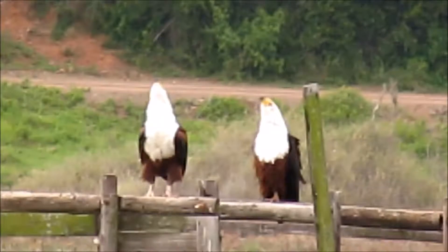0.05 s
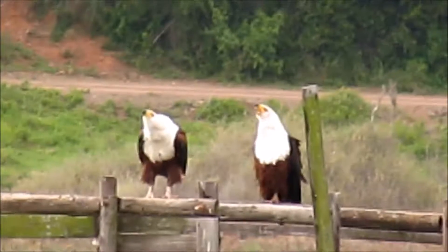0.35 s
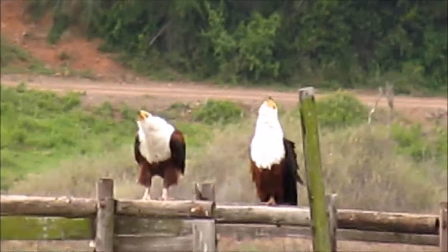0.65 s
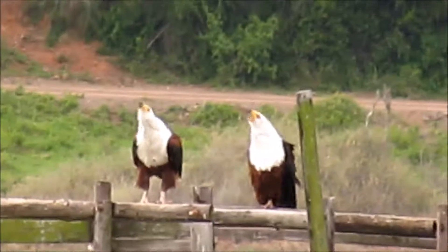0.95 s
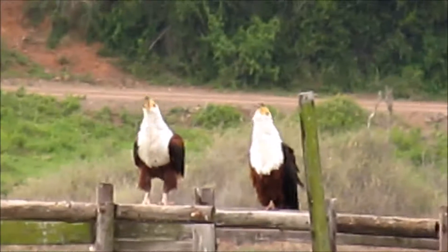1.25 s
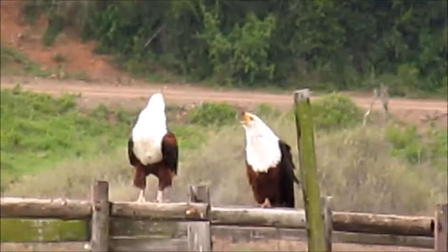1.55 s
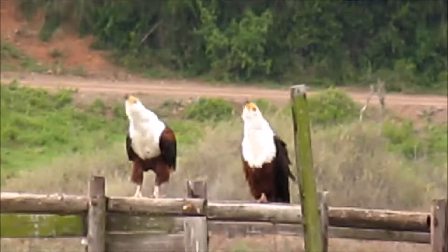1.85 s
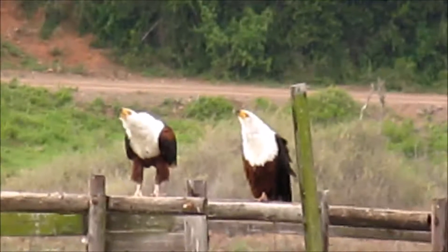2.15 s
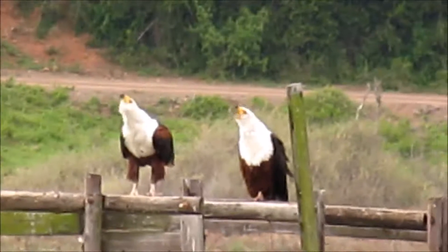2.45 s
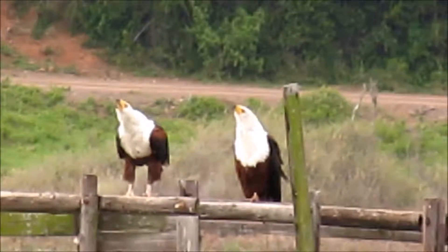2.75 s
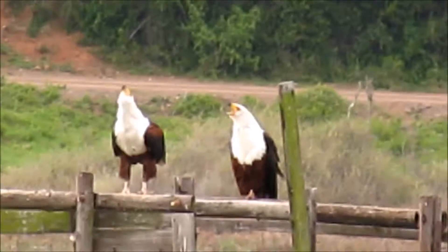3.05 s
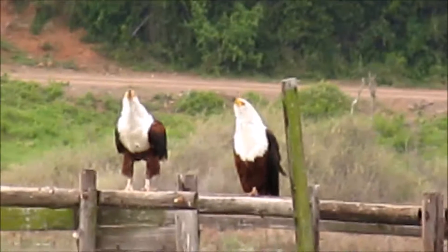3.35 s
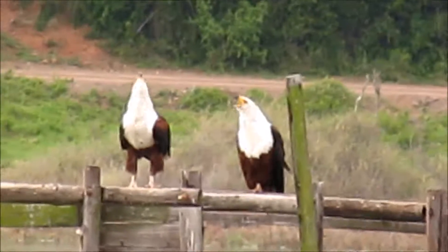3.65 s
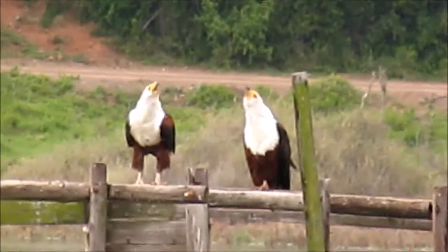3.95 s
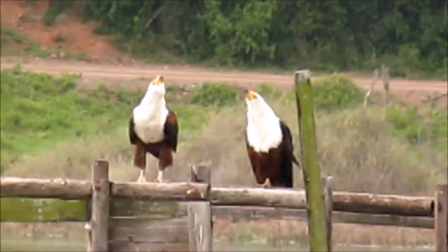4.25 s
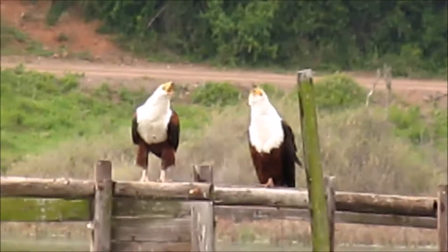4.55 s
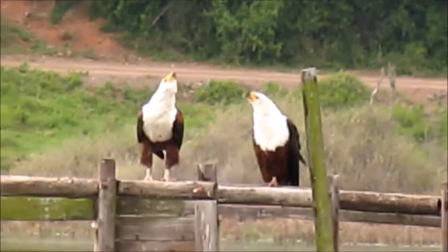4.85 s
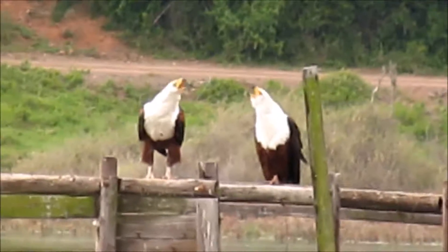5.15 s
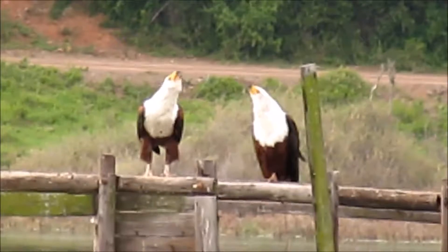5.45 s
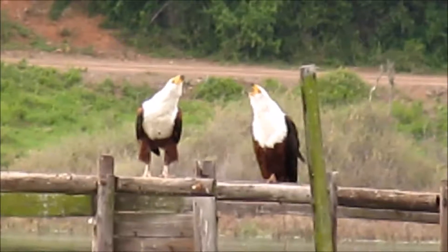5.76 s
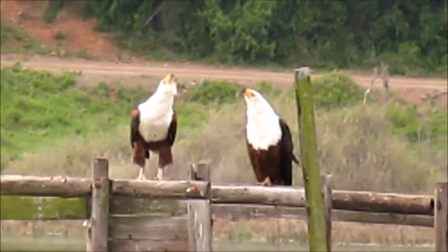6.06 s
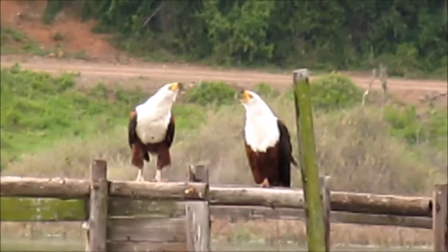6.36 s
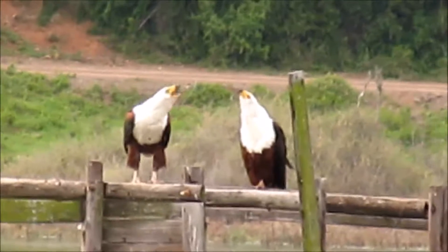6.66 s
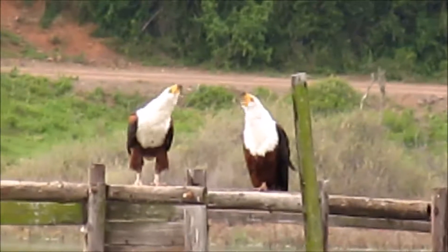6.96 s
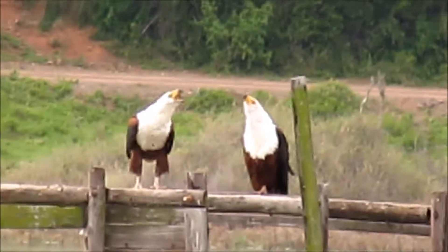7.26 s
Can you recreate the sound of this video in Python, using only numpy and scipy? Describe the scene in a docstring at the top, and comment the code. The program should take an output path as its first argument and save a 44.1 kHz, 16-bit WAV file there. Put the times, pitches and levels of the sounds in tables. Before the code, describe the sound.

Two eagles yelp in a duet for about seven and a half seconds. The lower one starts at 0.1 seconds with a tiny voice crack, and the higher one joins at 0.4. Each repeats roughly every 0.6 seconds, alternating and sometimes overlapping. Every yelp lasts about a third of a second, clear and slightly hoarse: it scoops up, usually breaks to a higher note, then falls away with a faint woodland echo.

Small birds sound more quietly behind, a little to the left. Thin rising tweets recur throughout, and clearer arched whistles come at about 1.6, 4 and 6.3 seconds. Soft low clucks run from 2.1 to 2.8 seconds and return near 7.2. A quick upward chirp repeats from 2.3 to 5.8 seconds, with very faint piping from 4 to 6.4. Soft, steady outdoor rumble and hiss continue underneath.

```python
"""Two fish eagles on a fence yelp in duet, one higher than the other. Each yelp is an arch of pitch
from the bird's voice box, the syrinx, and most break upward partway into a second register.
Small birds whistle, tweet and pipe in the bush behind, and a wooded slope answers faintly.
Soft outdoor rumble and hiss lie under it all; two microphone ports tip each pitch to one side."""
import sys
import numpy as np
from scipy import signal
from scipy.fft import rfft, irfft, next_fast_len
from scipy.io import wavfile
from scipy.ndimage import uniform_filter1d, map_coordinates

SR = 44100
rng = np.random.default_rng(int(sys.argv[2]) if len(sys.argv) > 2 else 0)


def generate_wav(sig):
    """Save sig (samples, or channels by samples) to the path in sys.argv[1] as 16-bit PCM at SR."""
    pcm = np.round(np.clip(np.atleast_2d(sig).T, -1, 1) * 32767).astype(np.int16)
    wavfile.write(sys.argv[1], SR, pcm)


N = 326340

# Each eagle's yelps. The "sag" is where the pitch slumps; the "break" is where it jumps up.
# (start [s], time to sag [s], time to break [s], length [s], base pitch [Hz], jump [ratio, 1 = none],
#  closing pitch drop [share], base level [dB], gain at the break [dB], fade in the sag [dB],
#  octave base level [dB], upper overtones' base level [dB], overtone loss at the break [dB])
HIGH_YELPS = [ (.37, 0.11, .162, 0.27, 1405, 1.117, 0.13, -36.5, 7, 11.5, -48, -50, 20),
              (1.048, 0.11, 0.081, 0.27, 1400, 1.15, 0.17, -39, 3.5, 6, -53, -56, -3.5),
              (1.64, 0.099, 0.055, .26, 1374, 1.143, 0.11, -44, 8.5, 9, -50, -54, 6),
              (2.228, 0.12, 0.077, .272, 1378, 1.125, .12, -50, -3.5, -6.5, -48.5, -57.5, 5),
              (2.98, 0.14, 0.035, 0.29, 1417, 1.12, .08, -43.5, 0.5, 7, -54, -54.5, 3),
              (3.68, 0.15, 0.054, 0.29, 1387, 1.132, 0.097, -36, 0, 5, -57, -58, 5),
              (4.322, .12, 0.06, 0.29, 1371, 1.135, .07, -40, 5, 7, -48.5, -56, 3),
              (4.965, .125, .075, 0.287, 1331, 1.155, 0.066, -43.5, 5, 7, -51, -66, -0.5),
              (5.587, 0.15, .29, 0.32, 1365, 1, 0.11, -42, 0, 17.5, -53.5, -59, 0),
              (6.225, 0.14, 0.31, 0.29, 1331, 1, 0.15, -52, 0, 3, -54, -59, 0),
              (6.912, 0.15, 0.056, 0.25, 1359, 1.14, 0.017, -40.5, 0, 9.5, -55, -59, 2.5), ]
LOW_YELPS = [ (.124, 0.099, 0.17, .297, 1225, 1.13, 0.23, -38.5, 3.5, 8, -43, -47.5, 11),
             (.555, 0.15, 0.096, 0.18, 870, 1.15, 0.32, -50, 7.5, 12, -69, -78, 12),
             (1.215, 0.26, 0.041, 0.32, 1079, 1.147, 0.045, -39.5, -0.5, 3, -60.5, -59, -1),
             (1.828, 0.12, 0.16, 0.3, 1159, 1.18, 0.25, -44, 6, 5, -50, -50.5, 13),
             (2.272, 0.16, 0.047, 0.2, 874, 1.209, 0.22, -51, 3, 5, -66, -70, 17),
             (2.84, 0.15, 0.041, 0.27, 1079, 1.106, 0.25, -44, -1, 10, -57, -68, 1),
             (3.44, 0.16, 0.19, 0.3, 1103, 1.186, 0.2, -43.5, 3, 4.5, -52, -59, 0),
             (4.02, .13, .19, .298, 1133, 1.166, 0.16, -44.5, 1.5, -0.5, -42.5, -55, 8),
             (4.632, .14, .225, .292, 1120, 1.185, 0.193, -43.5, 2, 4.5, -47.5, -52.5, -2),
             (5.212, 0.13, 0.23, 0.31, 1138, 1.165, 0.4, -47, 1, 3.5, -48.5, -58.5, -2),
             (5.842, 0.15, 0.24, 0.33, 1147, 1.14, .36, -58, -2, -8, -50.5, -58, -3.5),
             (6.522, 0.15, 0.24, .32, 1120, 1.195, 0.35, -44.5, 3, 8, -57, -56.5, 10),
             (7.17, .183, .28, .35, 1150, 1.19, .2, -46.5, 5, 10.5, -59.5, -58.5, 23), ]


def eagle(rows, sink_per_s, drop_s, attack_s, tilt_db, harmonics):
    """Each yelp is one arch of tension in the voice box: the pitch scoops up, sags and drops away."""
    voice = np.zeros(N)
    for (start, sag_s, break_s, length, pitch_hz, jump, drop,
         db, break_db, fade_db, octave_db, upper_db, dull_db) in rows:
        t = np.arange(0, length, 1 / SR)
        n, remaining, since_sag = len(t), length - t, np.maximum(t - sag_s, 0)
        attack = np.exp(-t / attack_s)  # goes from 1 to 0
        sag = 1 / (1 + np.exp((sag_s - t) / .0133))  # goes from 0 to 1
        broken = np.clip((t - break_s) / .002, 0, 1)
        arch = (1 - .26 * np.exp(-t / .017)) * (1 - .1 * sag) * (1 - sink_per_s * since_sag)
        hz = pitch_hz * arch * (1 - drop * np.exp(-remaining / drop_s)) * jump ** broken
        catch_db = 4 * np.exp(-((t - break_s) / .0015) ** 2)  # the voice catches as it breaks
        choke_db = catch_db + 10 * np.exp(-remaining / .016)  # and it ends softly
        main_db = db + break_db * broken - fade_db * sag - 21.5 * attack - choke_db
        main_db += 1.6 * sag * wobble(46.1, n)
        # Overtones speak sooner than the main tone, and die away from the sag on.
        bright_db = -8 * attack - 7 * sag - 79 * since_sag - dull_db * broken - choke_db
        jitter = .004 * wobble(149.3, n)
        rasp = .016 * (attack + .22 * sag) * wobble(700, n)  # weak drive lets the pitch scatter
        hz *= 1 + jitter + rasp
        gate = np.clip(np.minimum(t, remaining) / .0063, 0, 1)
        tone = syrinx(hz, main_db, octave_db + bright_db, upper_db + bright_db, tilt_db, harmonics)
        add(voice, start, gate * tone)
    return voice


# How well the main tone carries: (pitch [Hz], gain [dB])
CARRY = [(700, 8), (900, 2.5), (1040, 1), (1130, .5), (1240, 0), (1330, -0.5), (1395, 2.5), (1460, -2.5),
         (1540, 0), (1620, 3)]
# How the throat favours the upper overtones: (frequency [Hz], relative strength [dB])
THROAT = [(2700, 13), (3300, 3.5), (3650, 8.5), (4100, 4), (4500, -0.5), (5000, -8), (5600, -2), (6100, -5),
          (6300, -22)]


def syrinx(hz, main_db, octave_db, upper_db, tilt_db, harmonics):
    """The voice box sings a nearly pure tone; its membranes touch and add hoarse, uneven overtones."""
    n = len(hz)
    phase = 2 * np.pi * np.cumsum(hz) / SR
    throat = np.array([amp(along(THROAT, k * hz) + tilt_db * k) for k in range(3, harmonics + 1)])
    throat /= np.hypot(throat[0], throat[1])
    gains = [amp(main_db + along(CARRY, hz)), amp(octave_db), *(amp(upper_db) * throat)]
    tones = []
    for k, gain in enumerate(gains, 1):
        flutter_db = .6 * (k * wobble(61.5, n) + (k + .5) * wobble(20.3, n))
        tones.append(gain * amp(flutter_db) * np.sin(k * phase + rng.uniform(0, 2 * np.pi)))
    hoarse = 1 + amp(-13) * wobble(1100, n)
    throat_hiss = amp(octave_db - 14) * wobble(2600, n) * np.sin(2.5 * phase)
    return np.sqrt(2) * (tones[0] + hoarse * sum(tones[1:]) + throat_hiss)


# One tiny squeak: (time [s], pitch [Hz], level [dB])
SQUEAK = [(.125, 1250, -52), (.133, 1400, -44), (.142, 1470, -61)]


def voice_crack():
    """The eagle's voice cracks as the first yelp starts."""
    return sing([SQUEAK], glide_s=.004, jitter=.015, flutter_db=2.5, octave_db=-19)


# Note shapes: (time from the note's moment [s], pitch [Hz], relative level [dB])
WHISTLE_SHAPE = [(-.135, 2720, -23), (-.108, 2772, -7.5), (-.068, 3190, -3), (-.034, 3605, -2),
                 (0, 3715, -1.5), (.04, 3590, -7), (.095, 3285, -9), (.157, 3050, -26.5)]
RISE_SHAPE = [(-.027, 2666, 2.5), (0, 3703, 6), (.028, 3850, 0), (.055, 3990, 8), (.08, 3750, 2)]
# When each is sung: (time [s], level [dB])
WHISTLE_TIMES = [(1.584, -36), (3.992, -38.5), (6.303, -37)]
RISE_TIMES = [(3.218, -60), (5.775, -54.5)]
# V-shaped chirps: (time of the dip [s], lowest pitch [Hz], half length [s], level [dB])
DIPS = [(2.675, 3600, 0.022, -58.5), (3.058, 3680, 0.061, -60.5), (3.322, 2830, .035, -55.5),
        (5.935, 2660, .05, -52.5)]


def whistles_and_chirps(top_hz=4000):
    """Small birds sing slow arched whistles and quick chirps that dip or rise."""
    arches = repeated(WHISTLE_SHAPE, WHISTLE_TIMES, vary=.00068)
    whistles = sing(arches, glide_s=.045, jitter=.0017, flutter_db=.85, octave_db=-41)
    dips = [[(s - half, top_hz, db - 8.5), (s, hz, db), (s + half, top_hz, db - 8.5)]
            for s, hz, half, db in DIPS]
    rises = repeated(RISE_SHAPE, RISE_TIMES)
    return whistles + sing(dips + rises, glide_s=.0059, jitter=.0028, flutter_db=2.5, octave_db=-35)


# A steep upward tweet: (time from the note's moment [s], pitch [Hz], relative level [dB])
TWEET_SHAPE = [(-.004, 4300, -10), (.003, 4550, -5), (.014, 5200, -2), (.026, 6500, -4), (.035, 7600, -5),
               (.046, 8000, -12)]
# When it is sung: (time [s], level [dB])
TWEET_TIMES = [(.447, -52), (1.189, -53), (1.908, -55), (2.636, -59), (3.347, -56), (4.765, -56),
               (5.527, -61), (6.314, -53), (7.053, -53)]


def tweets():
    """Each high tweet opens with a stutter of five tiny chips that step down in pitch."""
    notes = repeated(TWEET_SHAPE, TWEET_TIMES)
    sweeps = sing(notes, glide_s=.003, jitter=.0087, flutter_db=4, octave_db=-53)
    chips = []
    for s, db in TWEET_TIMES:
        for k in range(5):
            start = s - .03 + k * .0065 + rng.normal(0, .0013)
            hz = (7400 - k * 620) * (1 + .025 * rng.standard_normal())
            level = db - 4 + rng.normal(0, 1.6)
            end_hz = hz * (1 - .22 * min(k / 2, 1))  # all but the first chip slide down
            chips.append([(start, hz, level), (start + .00415, end_hz, level + 5)])
    return sweeps + sing(chips, glide_s=.001, jitter=.05, flutter_db=1, octave_db=-40, edge_s=.002)


# Note shapes: (time from the note's moment [s], pitch [Hz], relative level [dB])
SLIDE_SHAPE = [(-.005, 4380, -9), (.008, 4680, -0.5), (.028, 5370, -1.5), (.048, 6200, -15),
               (.06, 7000, -9)]
PIPE_SHAPE = [(-.045, 3820, -28), (-.015, 3785, 7.5), (.02, 3750, 7.5), (.07, 3600, -7)]
CLUCK_SHAPE = [(-.016, 1794, -24), (0, 1630, -6.5), (.025, 1560, -4)]
# When each is sung: (time [s], level [dB])
SLIDE_TIMES = [(2.285, -58.5), (2.649, -56), (2.999, -56), (3.36, -55.5), (3.692, -53), (4.04, -52),
               (4.387, -54.5), (4.743, -55), (5.082, -60), (5.452, -58), (5.805, -62)]
PIPE_TIMES = [(4.13, -74), (4.81, -70), (5.12, -68), (5.44, -64.5), (5.77, -64), (6.09, -66), (6.41, -67)]
CLUCK_TIMES = [(2.14, -56), (2.277, -59), (2.413, -54), (2.548, -58), (2.687, -55.5), (2.824, -56.5),
               (7.19, -57), (7.331, -59)]


def chanting_birds():
    """Three birds each repeat one note: an upward slide, a thin pipe and a low cluck."""
    slides = sing(repeated(SLIDE_SHAPE, SLIDE_TIMES),
                  glide_s=.005, jitter=.0056, flutter_db=2, octave_db=-40)
    pipes = sing(repeated(PIPE_SHAPE, PIPE_TIMES),
                 glide_s=.01, jitter=.0029, flutter_db=4.5, octave_db=-35)
    clucks = sing(repeated(CLUCK_SHAPE, CLUCK_TIMES),
                  glide_s=.006, jitter=.012, flutter_db=4, octave_db=-20)
    return slides + pipes + clucks


# Short dry calls: (time [s], pitch [Hz], level [dB])
CONTACT_CALLS = [(0.806, 4100, -53.5), (1.867, 4300, -54), (2.76, 3520, -63), (2.853, 4130, -52),
                 (2.86, 5380, -58), (3.165, 4400, -61)]


def contact_calls():
    """Small birds keep in touch with ticks that droop slightly in pitch."""
    ticks = [[(s - .007, hz, db - 3), (s, hz, db), (s + .012, .96 * hz, db - 7)]
             for s, hz, db in CONTACT_CALLS]
    return sing(ticks, glide_s=.002, jitter=.025, flutter_db=2, octave_db=-30)


# How the trill swells and fades: (time [s], level [dB])
TRILL = [(.53, -97), (.59, -66), (.72, -65), (.87, -84)]


def trill(pulse_hz=65):
    """A faint trill: a high band of noise pulses fast enough to buzz."""
    buzz = 1 + .62 * np.sin(2 * np.pi * pulse_hz * np.arange(N) / SR)
    return buzz * blur(TRILL, centre_hz=3980, width_hz=440)


def far_flock(count=48, centre_hz=4000, spread=.14, length_s=.029):
    """Far birds twitter: faint short slides at random times and pitches."""
    times = rng.uniform(0, N / SR, count)
    notes = []
    for s, (pitch, slide, loudness) in zip(times, rng.standard_normal((count, 3))):
        hz = centre_hz * np.exp(spread * pitch)
        db = -70.5 + 1.5 * loudness
        notes.append([(s, hz, db), (s + length_s, hz * np.exp(spread * slide), db)])
    return sing(notes, glide_s=.011, jitter=.0137, flutter_db=1.5, octave_db=-26)


# How long echoes last, before stretch multiplies it: (frequency [Hz], time to fade by 60 dB [s])
ECHO_FADE = [(300, 0.23), (1400, 0.93), (4000, 0.74), (10000, 0.57)]


def foliage_echo(x, rise_s, stretch):
    """Leaves and trees scatter sound into a wash of echoes; the middle pitches last longest."""
    hz, t, noise = signal.stft(rng.standard_normal((2, SR)), SR, nperseg=256)
    fade = amp(-60 * t / (stretch * along(ECHO_FADE, hz)[:, None]))
    build_up = (1 - np.exp(-t / rise_s)) ** 2
    tail = signal.istft(noise * fade * build_up, SR, nperseg=256)[1]
    return signal.fftconvolve(x[None], tail / np.linalg.norm(tail[0]), axes=1)[:, :N]


# How two far sounds swell and fade: (time [s], level [dB])
DYING_ECHO = [(0, -49), (.12, -66), (.4, -100)]
HOLLOW_TONE = [(4.6, -68), (5, -63), (5.3, -63), (5.8, -84), (6.5, -61.5), (7.2, -77)]


def distant_tones():
    """The echo of an earlier yelp dies away; later a faint hollow tone swells twice."""
    return blur(DYING_ECHO, centre_hz=1379, width_hz=5) + blur(HOLLOW_TONE, centre_hz=834, width_hz=59)


# Tone colour of the background: (frequency [Hz], relative level [dB])
AIR_COLOUR = [(20, -6), (40, -6), (75, 2), (130, -2), (250, 0), (500, -3.5), (850, -6), (1400, -3),
              (1800, -11), (2600, -12.5), (3800, -14), (6000, -19), (9000, -22.5), (15000, -28.5)]
# How alike left and right are: (frequency [Hz], likeness [-1 = opposite, 1 = same])
AIR_LIKENESS = [(50, -0.17), (300, -0.5), (600, -0.54), (1100, -0.083), (2000, -0.11), (3800, 0.068),
                (8000, 0.039)]


def air(level_db, drift_db):
    """Steady outdoor rumble and hiss, drifting a little in loudness."""
    def response(hz):
        angle = np.arccos(along(AIR_LIKENESS, hz)) / 2
        return amp(along(AIR_COLOUR, hz)) * [np.cos(angle), np.sin(angle)]
    shared, opposite = filtered(rng.standard_normal((2, N)), response)
    stereo = np.array([shared + opposite, shared - opposite])
    return amp(level_db + drift_db * wobble(2.134, N)) * unit(stereo)


# Which side is louder for sound from the front: (frequency [Hz], left minus right [dB])
PORT_BALANCE = [(750, 1), (980, 4.5), (1100, 5), (1220, -1), (1350, -7), (1530, -1), (2250, -3.5),
                (2600, -7), (2800, 10.5), (3020, 4.5), (3300, 2.5), (3620, 1), (3900, 5), (4500, 0.5),
                (8000, 12)]
# How far the left wave runs ahead: (frequency [Hz], lead [radians])
PORT_LEAD = [(900, 0.3), (1100, -0.93), (1320, -0.47), (1450, -0.42), (2250, 0.79), (2620, 1),
             (3050, -0.081), (3500, -0.95), (3750, -1.33), (4050, 0.99)]


def microphone_ports(x):
    """Reflections around the two microphone openings tip each frequency to one side."""
    def response(hz):
        left = amp(along(PORT_BALANCE, hz) / 2) * np.exp(.5j * along(PORT_LEAD, hz))
        pair = np.array([left, 1 / left])
        return pair / np.sqrt(np.mean(abs(pair) ** 2, axis=0))
    return filtered(x, response)


def sing(notes, glide_s, jitter, flutter_db, octave_db, edge_s=.004):
    """Bird notes glide through (time, pitch, level) points and flutter on their way through leaves."""
    voice = np.zeros(N)
    for points in notes:
        times, pitches, levels = np.transpose(points)
        t = np.arange(times[0] - edge_s / 2, times[-1] + edge_s, 1 / SR)
        gate = np.clip(np.minimum(t - t[0], t[-1] - t) / edge_s, 0, 1)
        window = int(glide_s * SR) + 1  # rounds off the corners between points
        hz = uniform_filter1d(np.interp(t, times, pitches), window, mode="nearest")
        db = uniform_filter1d(np.interp(t, times, levels), window, mode="nearest")
        phase = 2 * np.pi * np.cumsum(hz * (1 + jitter * wobble(413, len(t)))) / SR
        tone = np.sin(phase) + amp(octave_db) * np.sin(2 * phase)
        add(voice, t[0], np.sqrt(2) * gate * amp(db + flutter_db * wobble(98.4, len(t))) * tone)
    return voice


def repeated(shape, times, vary=.0067):
    """One note shape sung again and again, never at quite the same pitch."""
    return [(np.array(shape) + [s, 0, db]) * [1, 1 + vary * rng.standard_normal(), 1] for s, db in times]


def blur(levels, centre_hz, width_hz):
    """A far sound, blurred into a narrow band of noise."""
    hiss = filtered(rng.standard_normal(N), lambda hz: np.exp(-.5 * ((hz - centre_hz) / width_hz) ** 2))
    return amp(np.interp(np.arange(N) / SR, *np.transpose(levels))) * unit(hiss)


def amp(db):
    """Turn decibels into a gain."""
    return 10 ** (np.asarray(db) / 20)


def unit(x):
    """Scale a sound to an average (rms) level of 1."""
    return x / np.sqrt(np.mean(x ** 2) + 1e-20)


def along(points, hz):
    """Read between (frequency, value) points, with octaves evenly spaced."""
    frequencies, values = np.transpose(points)
    return np.interp(np.log(hz + 1), np.log(frequencies + 1), values)


def wobble(rate, size):
    """A smooth curve through rate random values a second."""
    values = rng.standard_normal(int(size * rate / SR) + 4)
    return map_coordinates(values, [np.arange(size) * rate / SR])


def filtered(x, response):
    """Scale and shift each frequency of x by response(hz)."""
    size = next_fast_len(N + SR // 2)
    return irfft(rfft(x, size) * response(np.fft.rfftfreq(size, 1 / SR)), size)[..., :N]


def add(track, s, sound):
    """Mix a sound into a track at s seconds."""
    start = int(np.clip(round(s * SR), 0, N))
    track[start:start + len(sound)] += sound[:N - start]


def scene():
    """Eagles in front, small birds farther off, the slope behind them."""
    high = eagle(HIGH_YELPS, sink_per_s=.326, drop_s=.027, attack_s=.019, tilt_db=-.5, harmonics=4)
    low = eagle(LOW_YELPS, sink_per_s=.64, drop_s=.01523, attack_s=.026, tilt_db=.5, harmonics=5)
    eagles = high + low + voice_crack()
    birds = whistles_and_chirps() + tweets() + chanting_birds() + contact_calls() + trill() + far_flock()
    direct = eagles + birds * amp([[2.5], [-2.5]])  # the small birds sit to the left
    near = amp(-13.5) * foliage_echo(eagles, rise_s=.0051, stretch=.16)
    near += amp(-8) * foliage_echo(birds, rise_s=.0014, stretch=.17)
    slope = amp(-21) * foliage_echo(eagles + birds, rise_s=.068, stretch=3.1)
    return microphone_ports(direct + near + slope + distant_tones()) + air(level_db=-52.5, drift_db=.25)


def record(dry, top_hz=15320):
    """The camera keeps no treble above top_hz."""
    return filtered(dry, lambda hz: hz < top_hz)


dry = scene()
out = record(dry)
generate_wav(out)
```